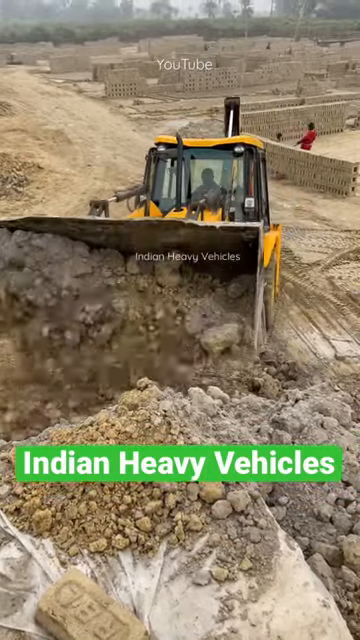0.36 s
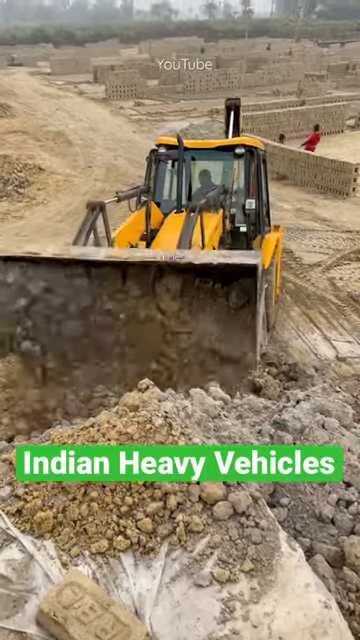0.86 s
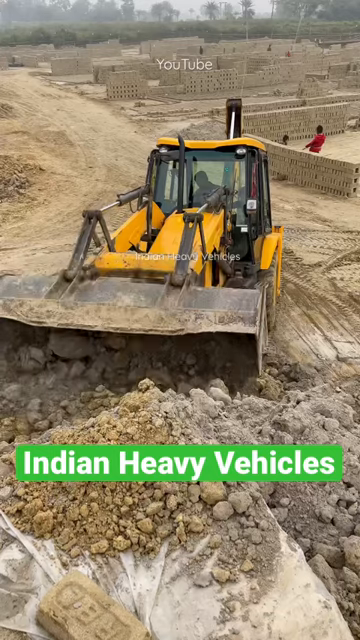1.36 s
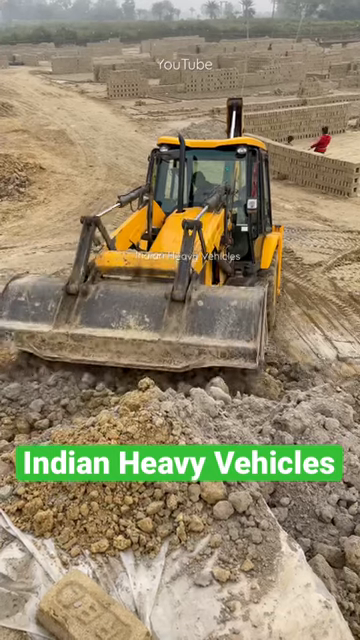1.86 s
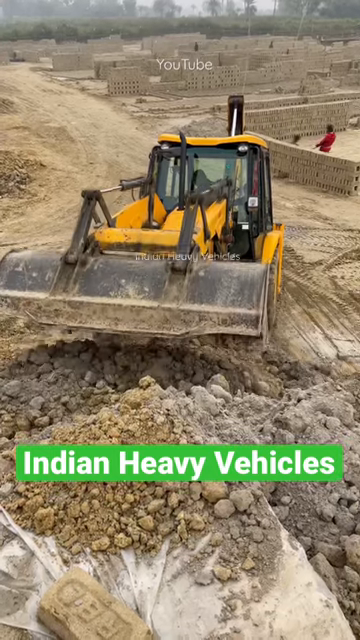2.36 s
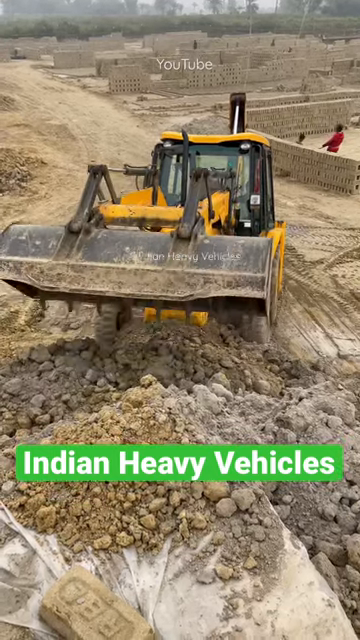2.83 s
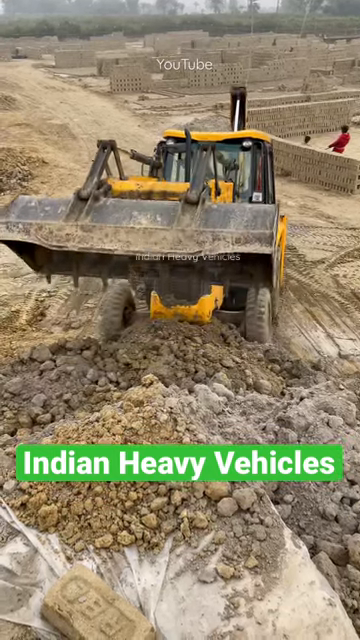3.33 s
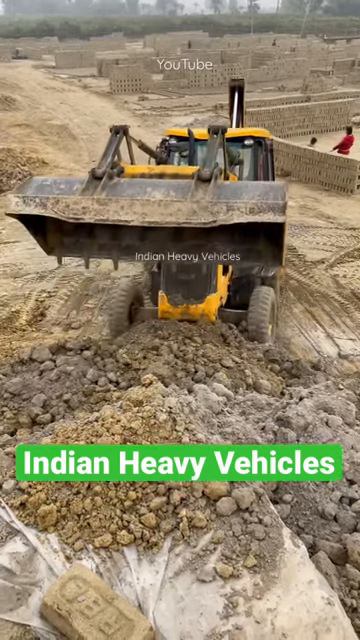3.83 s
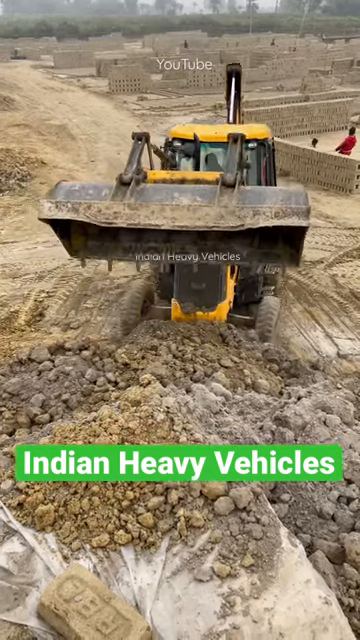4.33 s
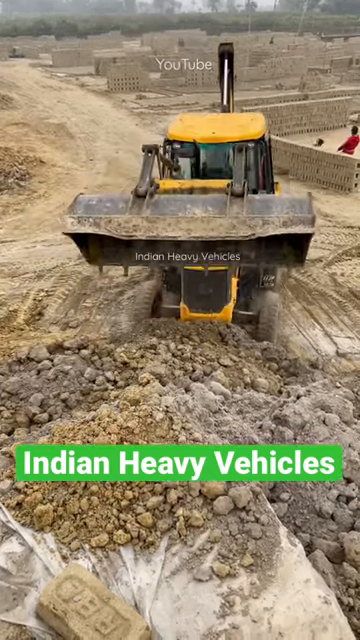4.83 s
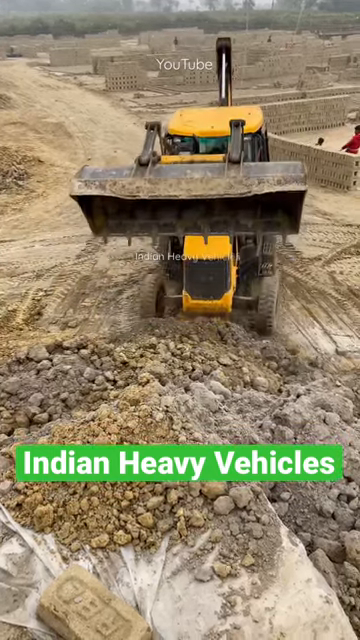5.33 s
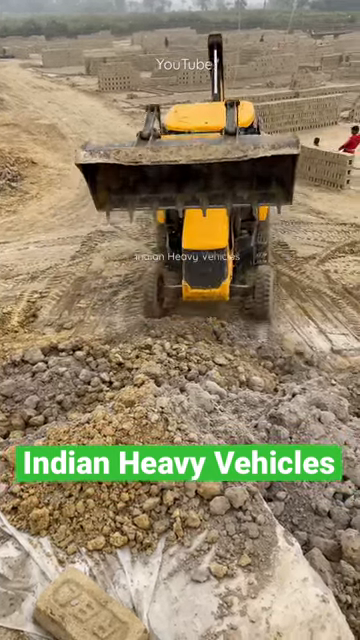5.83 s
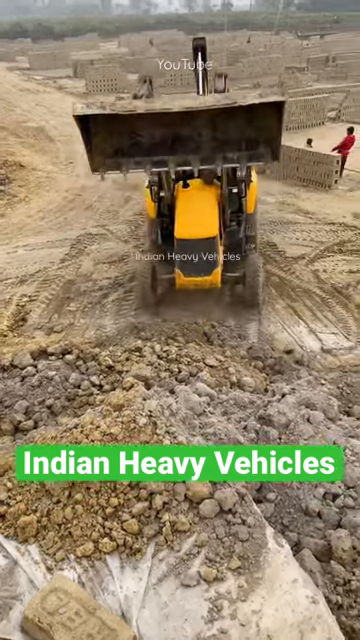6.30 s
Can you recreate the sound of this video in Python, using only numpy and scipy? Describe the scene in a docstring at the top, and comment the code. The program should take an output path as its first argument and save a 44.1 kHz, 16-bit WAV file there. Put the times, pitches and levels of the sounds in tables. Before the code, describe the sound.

Close diesel engine roars, coasts down, steel bucket bangs with gritty thuds, then the motor surges again and chugs on at a moderate, slowly sagging pace.

```python
"""A diesel loader roars close by near full speed, hums and clatters as it coasts down, and speeds up again.
Small metal parts tick; clods thud and the steel bucket knocks in a tight cluster, with a faint late blow.
Exhaust orders are sines that follow the firing rate; firings shape noise and ring the panels and parts.
Struck metal is a sum of decaying modes, and grit is a decaying noise.
Two microphone ports hear it all with frequency-dependent coherence, phase and level."""
import sys
import numpy as np
from scipy import signal
from scipy.fft import rfft, irfft, next_fast_len
from scipy.io import wavfile
from scipy.ndimage import uniform_filter1d

SR = 44100
rng = np.random.default_rng(int(sys.argv[2]) if len(sys.argv) > 2 else 0)


def digitize_waveform(pressure):
    """Quantize a signal to 16-bit integers and store it at the path in sys.argv[1].

    Rows of a 2-D input are taken as channels; values are limited to [-1, 1].
    """
    field = np.atleast_2d(pressure).T
    bounded = np.clip(field, -1, 1)
    quanta = np.round(bounded * 32767).astype(np.int16)
    wavfile.write(sys.argv[1], SR, quanta)


def boost(x):
    """Linear amplitude factor 10**(x/20) for a level x in decibels (scalar or array-like)."""
    u = np.asarray(x, float) / 20
    return 10 ** u


N = 294581  # length in samples
TIME = np.arange(N) / SR  # s

# Firing strengths of the cylinders in turn; rows: growl, clatter; columns: level/dB of each cylinder
CYLINDER_DB = [(0.3, -1.2, 1, 2.5), (.9, 0.038, 0.033, 1.2)]
LOW_DB, HIGH_DB = np.array(CYLINDER_DB)
# Spread from firing to firing: growl and tappets, clatter and strain, hiss, rings (each level/dB)
SPREAD_DB = [4.0, 1.2, 2.0, 1.0]
# Spectral shape of the clatter: f/Hz, relative density level/dB
CLATTER_SPECTRUM = [(380, -15.5), (500, -7), (570, -3), (645, -1.5), (730, -1), (800, -2), (1200, 1.5),
                    (1700, -0.5), (2600, -12.5), (3200, -10), (4200, -69), (8000, -71.5)]


def evened(x):
    """Normalises the mean power: scales to rms 1."""
    return x / np.sqrt(np.mean(x ** 2) + 1e-20)


def read(points, hz):
    """Interpolates a spectrum on a logarithmic frequency axis."""
    f, value = np.transpose(points)
    return np.interp(np.log(hz + 1), np.log(f + 1), value)


def coloured(x, points):
    """Linear filtering: multiplies the spectrum of each row by a tabled gain, then sets rms 1."""
    hz = np.fft.rfftfreq(x.shape[-1], 1 / SR)
    return evened(irfft(rfft(x) * boost(read(points, hz)), x.shape[-1]))


def resonate(x, hz, width):
    """Damped resonance: a pole pair whose radius follows from the bandwidth, at rms 1."""
    r = np.exp(-np.pi * width / SR)
    return evened(signal.lfilter([1, 0, -1], [1, -2 * r * np.cos(2 * np.pi * hz / SR), r ** 2], x))


def waver(per_s):
    """Slow random modulation: joins normal deviates, per_s of them a second, by straight lines."""
    knots = rng.standard_normal(400)
    return np.interp(TIME * per_s, np.arange(len(knots)), knots)


def modulation(bells):
    """Amplitude modulation by Gaussian rises and dips; bells: centre t/s, length/s, level/dB."""
    return boost(sum(db * np.exp(-(2 * (TIME - at) / length) ** 2) for at, length, db in bells))


def struck(modes, tilt_db, rise):
    """Modal superposition: decaying sines with a contact rise; a hard blow favours the high modes."""
    t = np.arange(SR // 2) / SR
    rings = 0
    for hz, db, t60 in modes:
        envelope = boost(db + tilt_db * np.log2(hz / 300) - 60 * t / t60)
        rings = rings + envelope * np.sin(2 * np.pi * hz * t)
    return rings * (1 - np.exp(-t / rise))


def add(mix, s, sound):
    """Superposition: adds a sound to the mix from s seconds on."""
    part = mix[:, round(s * SR):][:, :sound.shape[-1]]
    part += sound[..., :part.shape[1]]


def firing_rate():
    """Engine speed sets the fundamental frequency: firings per second at each sample."""
    # Speed curve: t/s, firing rate f/Hz
    speed = [(0, 52.08), (.44, 51.5), (.72, 54.5), (.79, 52.22), (.87, 50.01), (1.03, 40.89), (1.26, 38.32),
             (1.66, 30.43), (1.97, 31.77), (2.33, 31.6), (2.57, 33.74), (2.68, 37.0), (2.81, 40.12),
             (3.49, 40.01), (3.85, 37.3), (4.05, 36.15), (4.4, 34.85), (4.97, 33.47), (5.25, 34.05),
             (5.5, 34.0), (5.72, 33.05), (5.95, 33.15), (6.27, 33.0), (6.42, 34.15), (6.68, 38.76)]
    return np.interp(TIME, *np.transpose(speed))


def firing_phase():
    """Phase is the integral of frequency: firings counted from the start, with an offset."""
    return np.cumsum(firing_rate()) / SR + .465


def level(db, per_fuel, per_octave, per_uncovered):
    """Source power follows load, speed and shielding: gain of a layer at each sample."""
    # Fuel: t/s, level re full load/dB
    fuel = [(0, 2.5), (.1, 1.5), (.72, 0.5), (.77, -6.5), (0.82, -10), (.87, -10), (1.03, -7.5), (1.26, -8),
            (1.66, -7.5), (1.97, -4), (2.33, -4), (2.57, -3.5), (2.7, 0), (2.9, -5), (3.45, -2.5),
            (3.8, -4), (4.4, -3), (4.97, -2), (5.6, -4.5), (6.2, -5.5), (6.68, -6.5)]
    # Exposure, gained when the bucket uncovers the engine: t/s, level/dB
    uncovered = [(.8, -3), (1.2, 0), (1.7, 2.5), (2.2, -1.2), (2.8, -1.5), (3.7, -1.5), (4.05, -1),
                 (4.4, -2), (5.25, 2), (5.8, 3.5), (6.27, 4), (6.68, 5.5)]
    full_hz = 51.5  # firings per s at full load
    fuel_db = np.interp(TIME, *np.transpose(fuel))
    uncovered_db = np.interp(TIME, *np.transpose(uncovered))
    octaves = np.log2(firing_rate() / full_hz)
    return boost(db + per_fuel * fuel_db + per_octave * octaves + per_uncovered * uncovered_db)


def ignitions():
    """Phase modulation places each ignition: firing number, cylinder, seconds since ignition."""
    # The clatter runs slightly ahead of or behind the hum: t/s, lead/firings
    lead = [(0, .04), (.85, .15), (1.1, .02), (2.4, 0), (2.7, .15), (3.8, .15), (4.0, .06), (4.5, .14),
            (4.75, 0), (5.05, -.07), (5.4, 0), (5.9, -.06), (6.3, .02), (6.5, .08)]
    timing = firing_phase() + np.interp(TIME, *np.transpose(lead))
    firing = timing.astype(int)
    return firing, firing % len(LOW_DB), (timing % 1) / firing_rate()


def uneven(spread_db):
    """Cyclic variation: a random level in dB, held through each firing."""
    firing, _, _ = ignitions()
    return spread_db * rng.standard_normal(400)[firing]


def bursts(rise, sharp, steady, cylinder_db, spread_db):
    """Amplitude-modulated noise: swells at ignition, dies to a steady bed; two unrelated rows."""
    _, cylinder, since = ignitions()
    strength = boost(cylinder_db[cylinder] + uneven(spread_db))
    shape = strength * (since / rise * np.exp(1 - since / rise)) ** sharp
    return (steady + uniform_filter1d(shape, 130)) * rng.standard_normal((2, N))


def exhaust():
    """Harmonic synthesis: sines that follow the firing rate, weighted by the response of the pipe."""
    # Orders: order, rms level before the pipe/dB, phase/cycles, dB per fuel dB, dB per uncovered dB
    orders = [(1, -16.5, 0.86, 0.3, 0.5), (2, -18, 0.87, 1.23, 0.15), (3, -19.5, 0.069, 0.96, 1.5),
              (6, -31.5, 0.32, 1.5, 0.25)]
    # Response of the pipe: f/Hz, level/dB
    pipe = [(31, -14), (40, -8), (46, 0), (51, 0), (62, 1.5), (80, 2), (102, -0.46), (120, -3),
            (155, -15.5), (190, -7), (240, -5), (330, -1.5)]
    # Pitches at which the pipe sings: f/Hz, width/Hz, level/dB
    pipe_peaks = [(198.8, 26, 15), (307.3, 10, 7.5)]
    # Rises and dips of each order, deepest while the engine slows: t/s, length/s, level/dB
    order_bells = [
        [(1.35, 0.43, -8), (2.95, .4, 0)],
        [(.3, 0.23, -0.5), (1.42, 0.32, 1), (2.9, .3, 2), (4.6, .7, 0.5), (5.1, 0.62, -2)],
        [(.9, 0.7, -17), (1.3, 0.76, -22), (2.1, 0.37, -4), (3.3, 0.27, -1), (3.9, 0.32, 2.5), (4.95, .25, 2.5),
         (5.4, 0.49, 2)],
        [(1.45, 0.47, -12), (2.5, 0.28, 0.5), (3.4, 0.65, 3)],
    ]
    # Slip of orders 1 to 3 against the firings while the speed falls; order 6 stays locked: t/s, phase/cycles
    slips = [
        [(.55, -.43), (1.25, .12)],
        [(.55, -.82), (.75, -.56), (1.1, -.45), (1.3, -.31), (1.7, -.17), (1.95, 0)],
        [(.6, -.96), (1.1, -.37), (1.3, -.2), (1.75, -.24), (2.0, 0)],
        [(0, 0), (6.68, 0)],
    ]
    # Half orders of the unequal cylinders: order, peak level re the rms of order 2/dB
    halves = [(1.5, -19), (2.5, -11.5), (3.5, -19.5)]
    phase, rate = firing_phase(), firing_rate()
    gains, out = [], np.zeros(N)
    for (k, db, start, per_fuel, per_uncovered), bells, slip in zip(orders, order_bells, slips):
        hz = k * rate
        pipe_db = read(pipe, hz)
        for f, width, top_db in pipe_peaks:
            pipe_db = pipe_db + top_db / (1 + (2 * (hz - f) / width) ** 2)
        gain = level(db, per_fuel, 0, per_uncovered) * modulation(bells) * boost(pipe_db)
        gains.append(gain)
        cycles = round(k) * phase + start + np.interp(TIME, *np.transpose(slip))
        out += np.sqrt(2) * gain * boost(waver(10)) * np.cos(2 * np.pi * cycles)
    for half, (_, db) in enumerate(halves):
        out += gains[1] * boost(db + 4 * waver(9)) * np.cos(np.pi * (3 + 2 * half) * phase)
    return out


def block_hum():
    """Harmonic synthesis with random modulation: the block hums unsteadily at higher orders."""
    # Orders: order, rms level at full load before rises and dips/dB, dB per fuel dB, dB per octave of speed
    hum_orders = [(4, -33, 1.2, 2), (5, -45.5, -2, 33), (8, -34.5, 4, 34)]
    # Rises and dips of each order: t/s, length/s, level/dB
    hum_bells = [
        [(1.38, 0.18, 12.4), (3.0, .5, 4.8)],
        [(.3, .6, -1), (.85, 0.22, -5.5), (5.5, .6, 11)],
        [(.7, .2, -5)],
    ]
    phase, out = firing_phase(), np.zeros(N)
    for (k, *law), bells in zip(hum_orders, hum_bells):
        gain = level(*law, 0) * modulation(bells) * boost(2 * waver(6.9))
        out += np.sqrt(2) * gain * np.cos(2 * np.pi * round(k) * phase + 0.81 * waver(5))
    return out


def firing_impulses():
    """Impulsive excitation: one pulse of uneven strength at each ignition."""
    firing, _, _ = ignitions()
    return np.diff(firing, prepend=firing[0]) * boost(uneven(.6))


def cylinder_jolts(fired):
    """Convolution with a fixed impulse response for each cylinder: a repeating four-beat pattern."""
    _, cylinder, _ = ignitions()
    jolts = rng.standard_normal((len(LOW_DB), 800)) * signal.windows.hann(800)
    beats = [signal.oaconvolve(fired * (cylinder == k), jolt)[:N] for k, jolt in enumerate(jolts)]
    return evened(sum(beats))


def growl(jolts):
    """Filtered burst noise: the low growl of the firings, with a share of the repeating jolts."""
    # Spectral shape: f/Hz, relative density level/dB
    spectrum = [(130, -12), (200, -0.5), (290, -1), (430, -4.5), (490, -10.5), (700, -64)]
    # Law: level at full load/dB, dB per fuel dB, dB per octave of speed, dB per uncovered dB
    law = (-23.5, 0.26, 12, -0.02)
    noise = bursts(0.011, 0.55, 0.66, LOW_DB, SPREAD_DB[0])
    return level(*law) * coloured(evened(noise) + 0.2 * jolts, spectrum)


def firing_knocks():
    """Filtered burst noise: the broadband knock of each firing, at rms 1."""
    return coloured(bursts(0.01, 1.6, 0.59, HIGH_DB, SPREAD_DB[1]), CLATTER_SPECTRUM)


def panels(knocks, jolts):
    """Forced resonance: knocks and jolts ring the panels."""
    # Panels: f/Hz, width/Hz, level re the knocks/dB
    panel_modes = [(338, 20.6, 2), (377, 45, -1), (726, 120, -4.5), (1135, 37, -11.5), (1534, 26, -25.5),
                   (1910, 45, -16), (2206, 290, -6), (2410, 73, -10), (2553, 86, -6)]
    shake = evened(knocks) + 0.38 * coloured(jolts, CLATTER_SPECTRUM)
    return sum(boost(db + 2.1 * waver(2.6)) * resonate(shake, f, width) for f, width, db in panel_modes)


def clatter(knocks, jolts):
    """Superposition of direct and resonant sound: the knocks with the panels they ring."""
    # Law: level of the knocks at full load/dB, dB per fuel dB, dB per octave, dB per uncovered dB
    law = (-32.5, 0.68, 7, 0.95)
    return level(*law) * (knocks + panels(knocks, jolts))


def block_hiss():
    """Independent band modulation: each band of the burst noise is uneven in its own way."""
    # Spectral shape: f/Hz, relative density level/dB
    spectrum = [(2700, -67), (3400, 2.5), (4100, -3), (4600, 1), (5900, -3), (7500, -7), (8700, -1.5),
                (10500, -2.5), (11700, -12), (12500, -42), (13300, -54)]
    # Band edges: f/Hz
    edges = [0, 4800, 7000, 9300, 22050]
    # Law: level at full load/dB, dB per fuel dB, dB per octave of speed, dB per uncovered dB
    law = (-42.5, 0.41, 2, 1)
    band = np.digitize(np.fft.rfftfreq(N, 1 / SR), edges[1:-1])
    noise = np.zeros((2, N))
    for k in range(len(edges) - 1):
        part = bursts(0.0075, 0.78, 0.34, HIGH_DB, SPREAD_DB[2])
        noise += irfft(rfft(part) * (band == k), N)
    return level(*law) * coloured(noise, spectrum)


def strain():
    """Load-dependent burst noise: a bright hiss that grows steeply with fuel."""
    # Spectral shape: f/Hz, relative density level/dB
    spectrum = [(3000, -17), (3600, 1), (4600, -2.5), (5300, 6), (6300, -2), (7600, -12), (10500, -1.5),
                (12200, -24), (13300, -50)]
    # Law: level at full load/dB, dB per fuel dB, dB per octave of speed, dB per uncovered dB
    law = (-42, 3, 4, 1)
    return level(*law) * coloured(bursts(0.0068, 1.4, 0.32, HIGH_DB, SPREAD_DB[1]), spectrum)


def rumble():
    """Filtered stationary noise: chassis and tyres."""
    # Spectral shape: f/Hz, relative density level/dB
    spectrum = [(25, -28), (60, 1.5), (130, 0), (180, -1), (260, -47), (500, -53)]
    # Law: level at full load/dB, dB per fuel dB, dB per octave of speed, dB per uncovered dB
    law = (-29, -0.32, 2, 0.5)
    return level(*law) * coloured(rng.standard_normal(N), spectrum)


def tappets():
    """Filtered burst noise: the light ticking of the valve gear."""
    # Spectral shape: f/Hz, relative density level/dB
    spectrum = [(2400, -30), (3200, -4.5), (4000, 1), (4700, -2), (6000, -23), (9500, -38), (11000, -7),
                (12800, -38)]
    # Law: level at full load/dB, dB per fuel dB, dB per octave of speed, dB per uncovered dB
    law = (-58.5, -0.8, -7.5, 0.53)
    return level(*law) * coloured(bursts(0.0084, 1.05, 0.38, HIGH_DB, SPREAD_DB[0]), spectrum)


def engine_rings(fired, knocks):
    """Impulsively excited resonance: narrow rings of engine parts, each lagging the ignition."""
    # Modes: f/Hz, width/Hz, (relative level/dB from each cylinder)
    ring_modes = [(348, 35, (0, -5, -9, -9)), (544, 20, (0, -9, -8, -10)), (737, 35, (0, -14, -6, -11)),
                  (988, 36, (-9, 0, 0, -20)), (398, 35, (0, -8, -6, -13)), (872, 40, (-2, 0, -3, -1)),
                  (2345, 32, (0, -2, -1, -3)), (3950, 90, (-3, 0, -4, -1)), (4330, 90, (0, -3, -1, -4))]
    # Laws: level at full load before rises and dips/dB, dB per fuel dB, dB per octave, dB per uncovered dB
    ring_laws = [(-32, 1.2, 4, 0.49), (-36, 0.34, 12.5, 1.07), (-42.5, 1.6, 4, 1.8),
                 (-35.5, 1.38, 10, 2.82), (-31, 0.43, 19, 0.25), (-52, 0.93, -4, .3),
                 (-54.5, 0.41, -6, 0.91), (-74, -0.42, 2, 0.33), (-72.5, -0.35, 2, 0.48)]
    # Rises and dips of each ring: t/s, length/s, level/dB
    ring_bells = [
        [(3.2, 1.4, 5.5), (4.65, 0.53, 6), (5.15, 0.63, 3.5), (5.9, .4, 0), (6.55, .3, 5)],
        [(2.617, 0.042, 15), (2.77, 0.12, 12), (3.053, 0.4, 6.5), (4.8, 0.48, 8), (5.195, 0.22, 8.5),
         (5.498, 0.27, 4), (5.82, 0.37, 7.5), (6.0, 0.092, -21)],
        [(3.35, 0.46, 6), (5.05, 0.46, 8.5), (5.75, 0.1, 11), (6.15, 0.18, 7)],
        [(3.9, 1.4, 6.5), (5.4, 0.26, 0), (6.202, 0.38, 2.5), (6.62, 0.17, 3)],
        [(2.95, 0.64, 6.5), (6.55, .3, 8)],
        [(3.5, 0.34, 12.5), (3.93, 0.58, 9)],
        [(1.048, 0.93, 9.5)],
        [(1.42, 0.46, 18)],
        [(1.4, 0.63, 17)],
    ]
    # Delay of each part after ignition: t/s
    ring_lags = [.006, .012, .01, .007, .009, .006, .005, .004, .005]
    rise_hz = 70  # a wider second resonance softens the start
    _, cylinder, _ = ignitions()
    out = np.zeros((2, N))
    for (f, width, each_db), law, bells, lag in zip(ring_modes, ring_laws, ring_bells, ring_lags):
        kick = np.roll(fired, round(lag * SR)) + .003 * knocks
        kick = kick * boost(np.array(each_db)[cylinder] + uneven(SPREAD_DB[3]))
        ring = resonate(resonate(kick, f, width), f, rise_hz)
        out += level(*law) * ring * modulation(bells)
    return out


def engine():
    """Superposition of tonal, noisy and resonant layers that share one firing rate."""
    fired = firing_impulses()
    jolts = cylinder_jolts(fired)
    knocks = firing_knocks()
    tones = exhaust() + block_hum()
    noises = growl(jolts) + clatter(knocks, jolts) + block_hiss() + strain() + rumble() + tappets()
    return tones + noises + engine_rings(fired, knocks)


def metal_ticks():
    """Modal impact: a small loose metal part clicks now and then."""
    # Clicks: t/s, strength level/dB
    clicks = [(0.998, -33.5), (2.4108, -41), (2.9948, -36), (3.7045, -41.5)]
    # Modes of the part: f/Hz, level/dB, t60/s
    click_modes = [(4100, -5, 0.058), (5300, 2, 0.024), (5900, 9.5, 0.019), (6400, 1.5, 0.028),
                   (7150, -1, .02), (8050, -7, .02), (9300, 0, 0.014), (10570, -10, .03)]
    out = np.zeros((2, N))
    for s, db in clicks:
        add(out, s, boost(db) * struck(click_modes, 0, .0004))
    return out


def clods():
    """Heavily damped modal impact: two clods land with short thuds."""
    # Landings: t/s, strength level/dB
    landings = [(1.785, -11.5), (1.801, -9.5)]
    # Modes of a thud: f/Hz, level/dB, t60/s
    thud_modes = [(254, 6, 0.036), (324, -25, 0.033)]
    out = np.zeros((2, N))
    for s, db in landings:
        add(out, s, boost(db) * struck(thud_modes, 0, 0.002))
    return out


def bucket():
    """Modal impact with friction noise: each blow rings the steel and throws a short gritty scrape."""
    # Blows: t/s, blow level/dB, hardness as treble tilt/(dB per octave), scrape level/dB
    blows = [(1.795, -40, 0, -31), (1.81, -40, 5, -20), (1.82, -8, 0, -18), (1.824, -18, 5.5, -18),
             (1.8305, -5.5, 1, -10.5), (1.84, -16, 5.5, -16.5), (1.865, -10.5, -1, -25),
             (1.875, -33, -2, -18), (1.898, -15.5, 0.5, -20), (1.941, -39, 4, -22.5),
             (4.809, -18.5, -5, -52)]
    # Modes of the steel: f/Hz, level/dB, t60/s
    steel_modes = [(87.4, 4, 0.11), (148, -10, .08), (188, -8, 0.12), (260, 4, 0.032), (338, -8.5, 0.17),
                   (876, -6.5, 0.04), (1080, -13, 0.03), (1414, -18, 0.043), (1700, -22, 0.013),
                   (2280, -5, 0.007)]
    # Spectral shape of the grit: f/Hz, relative density level/dB
    grit_spectrum = [(300, -15), (800, 8.5), (2400, 1), (4000, -2.5), (7000, -17.5), (11000, -11),
                     (13500, -36)]
    scrape_rise_s, scrape_t60_s = 0.0026, 0.052
    body_lag_s = 0.00339  # the steel answers just after the grit is heard
    out, t = np.zeros((2, N)), np.arange(8192) / SR
    for s, blow_db, tilt_db, scrape_db in blows:
        grit = coloured(rng.standard_normal((2, len(t))), grit_spectrum)
        envelope = boost(scrape_db - 60 * t / scrape_t60_s) * (1 - np.exp(-t / scrape_rise_s))
        add(out, s + body_lag_s, boost(blow_db) * struck(steel_modes, tilt_db, 0.003))
        add(out, s, envelope * grit)
    return out


def scene():
    """Superposition in two rows, shared and scattered.

    Most noises and the grit differ between the rows; tones, rumble and struck metal agree."""
    return engine() + metal_ticks() + clods() + bucket()


def band_limit(x):
    """A steep low-pass at the top of the band."""
    return signal.sosfilt(signal.butter(12, 13030, fs=SR, output="sos"), x)


def record(dry):
    """Partial coherence: the right port hears a phase-shifted blend of shared and scattered sound."""
    # Likeness of the ports: f/Hz, coherence
    likeness = [(330, 1), (520, .97), (980, .55), (1300, .9), (2100, .96), (2600, .9), (3200, .25),
                (4400, .15), (5000, .72), (5900, .99), (7000, .62), (7700, .62), (9000, 1), (9600, 1),
                (10100, .85), (11500, .65), (11800, .85), (12600, .9)]
    # Phase by which left leads: f/Hz, phase/rad
    left_lead = [(365, 0), (600, 1.2), (850, 0), (1150, -1.1), (1700, 0), (2150, 0), (2600, 1.55),
                 (3050, 1.4), (3800, 2 * np.pi), (5900, 4 * np.pi), (7000, 13.7), (8400, 15.4),
                 (9000, 5 * np.pi), (9600, 5 * np.pi), (11600, 18), (11800, 6 * np.pi)]
    # Left minus right: f/Hz, level/dB
    left_lean = [(200, .22), (480, 0), (720, 14), (850, 10), (1080, 10), (1600, 1), (2000, 2.5), (2330, -2),
                 (2750, 5), (3300, 5), (3600, 0), (4100, -1.5), (4500, 2), (5000, -4.5), (5600, 1),
                 (5900, 0), (11500, 0), (12300, 3)]
    size = next_fast_len(N)
    hz = np.fft.rfftfreq(size, 1 / SR)
    shared, scattered = rfft(dry, size)
    same = np.clip(read(likeness, hz), 0, 1)
    lean = boost(read(left_lean, hz))
    blend = same * shared + np.sqrt(1 - same ** 2) * scattered
    right = blend * np.exp(-1j * np.interp(hz, *np.transpose(left_lead)))
    low_cut = 1 / (1 + (38 / (hz + 1)) ** 4)  # the microphone drops the deepest bass
    balance = np.sqrt(2 / (1 + lean ** 2))  # keeps the summed power of the two gains
    spectra = np.array([lean * shared, right]) * balance * low_cut
    ports = irfft(spectra, size)[:, :N]
    return band_limit(ports)


dry = scene()
out = record(dry)
digitize_waveform(out)
```